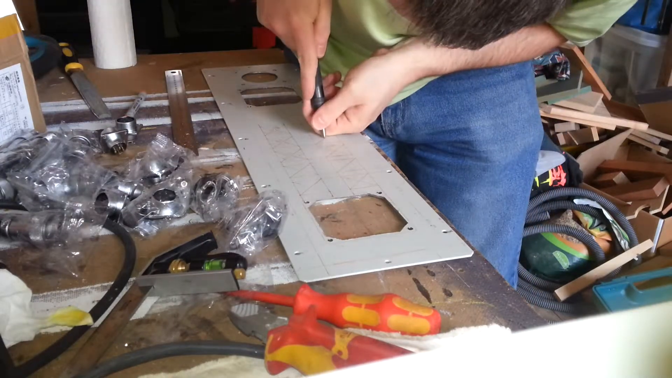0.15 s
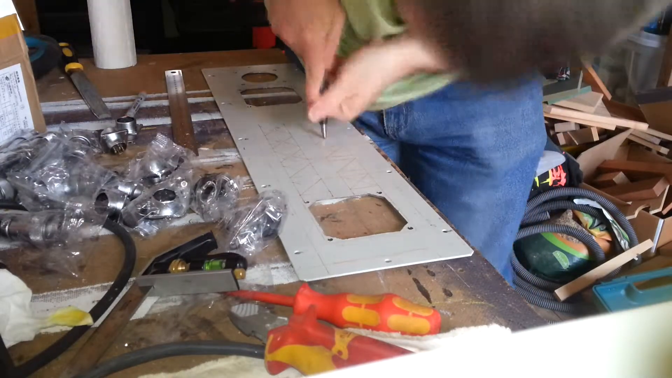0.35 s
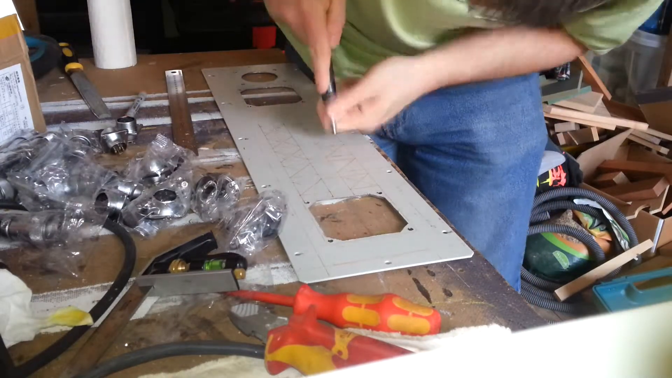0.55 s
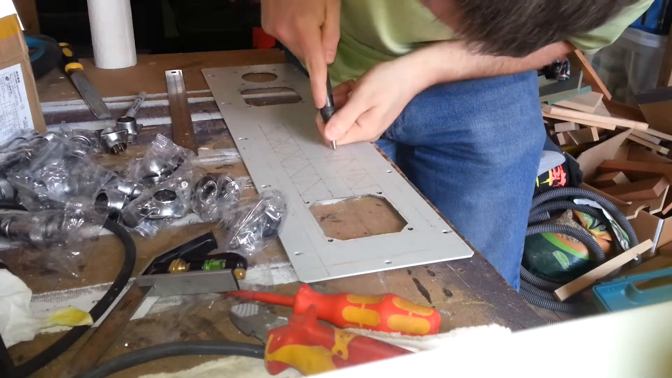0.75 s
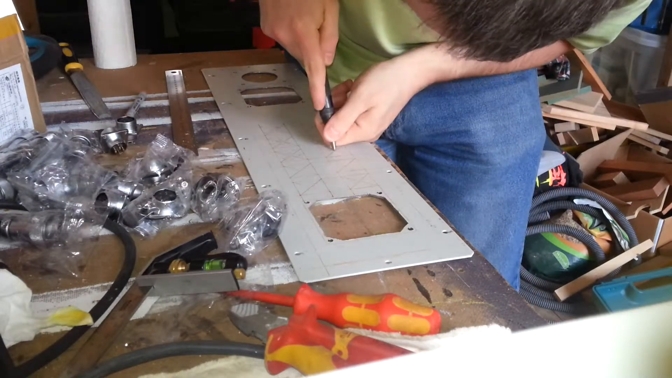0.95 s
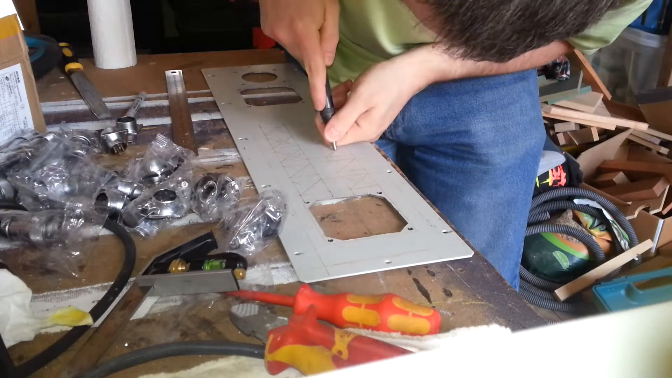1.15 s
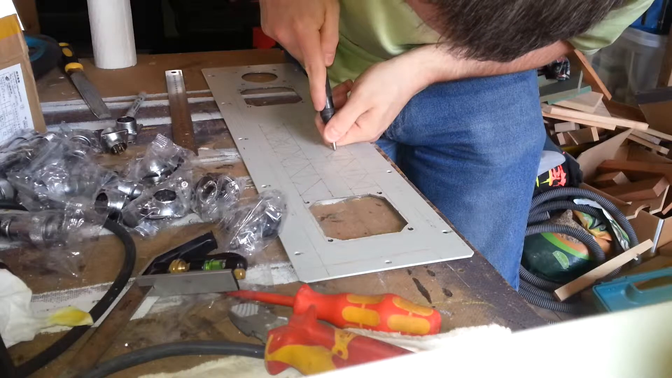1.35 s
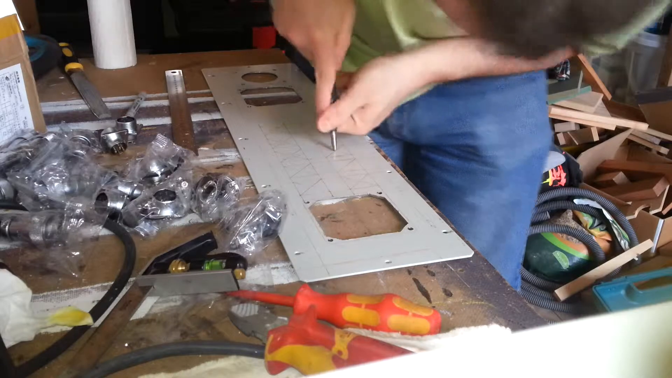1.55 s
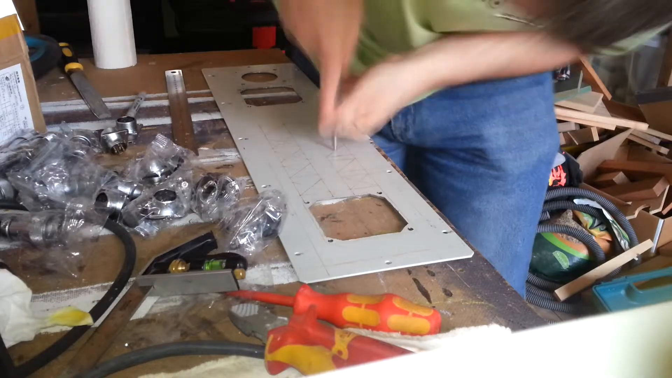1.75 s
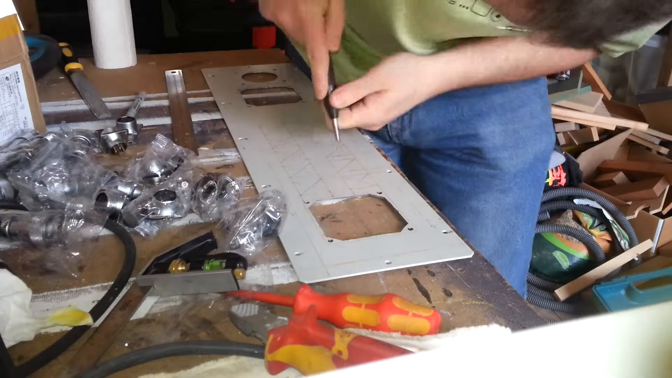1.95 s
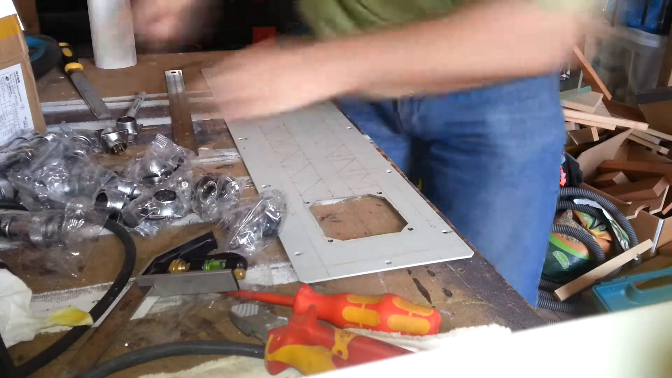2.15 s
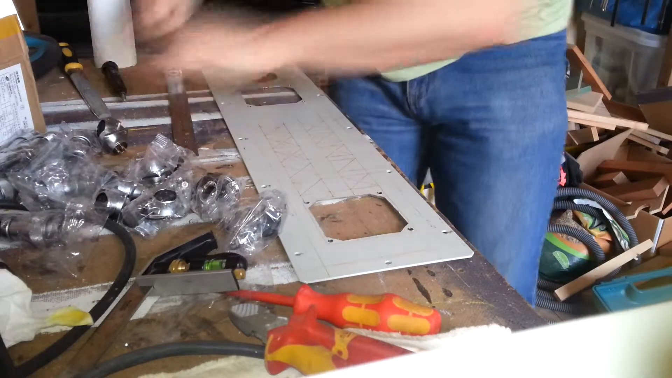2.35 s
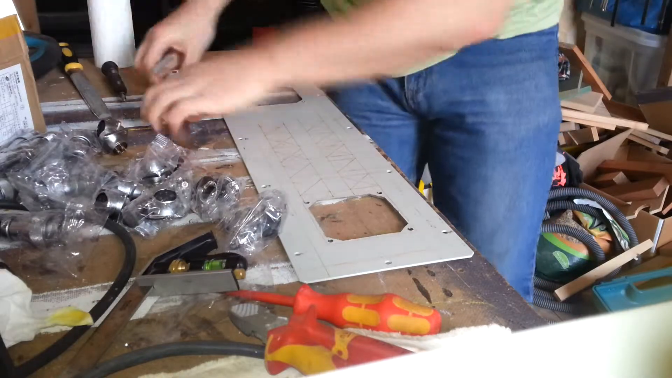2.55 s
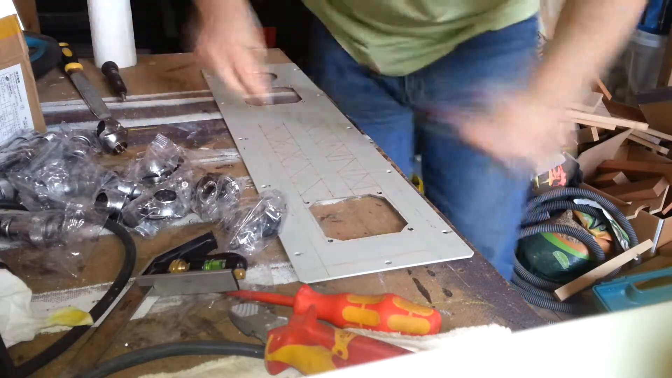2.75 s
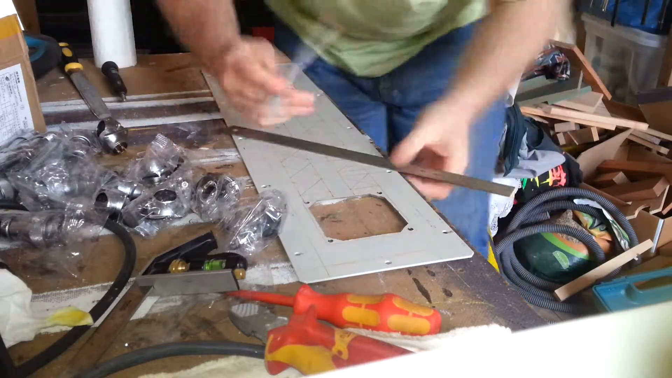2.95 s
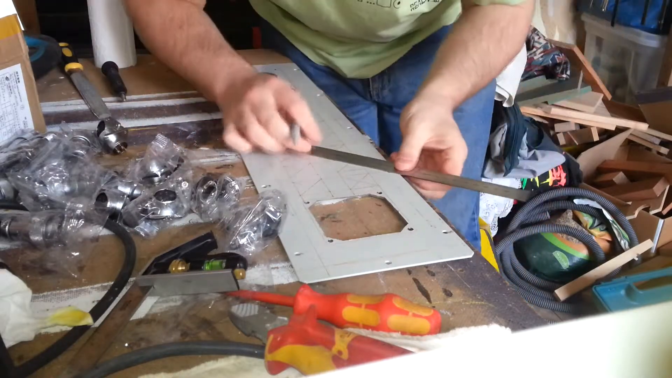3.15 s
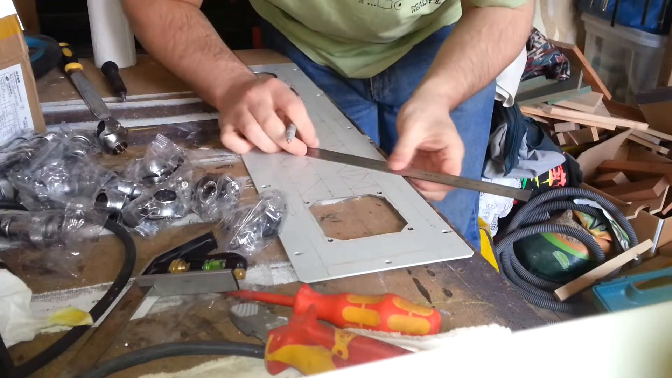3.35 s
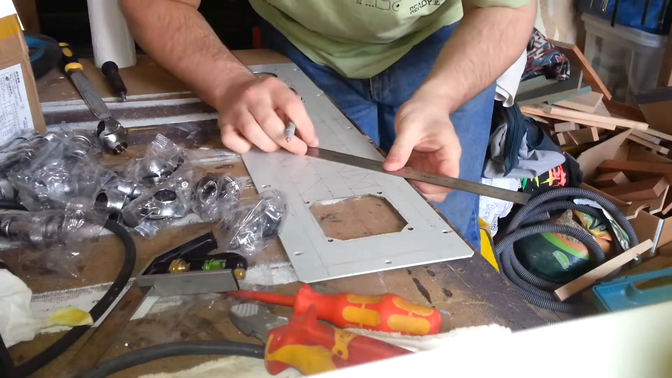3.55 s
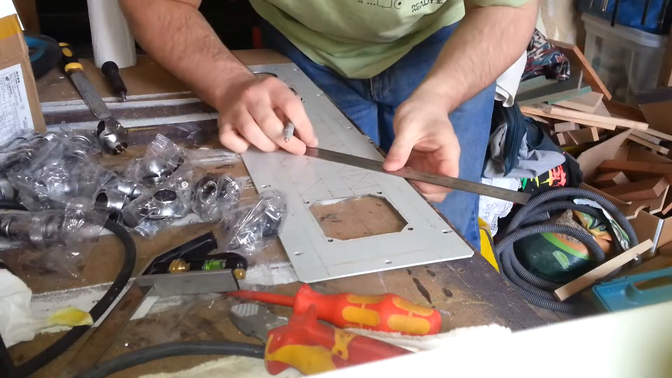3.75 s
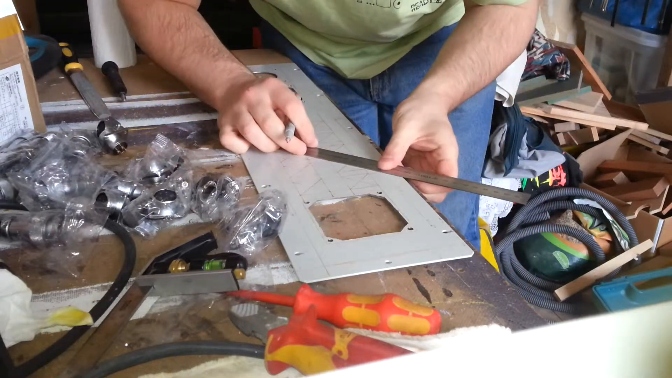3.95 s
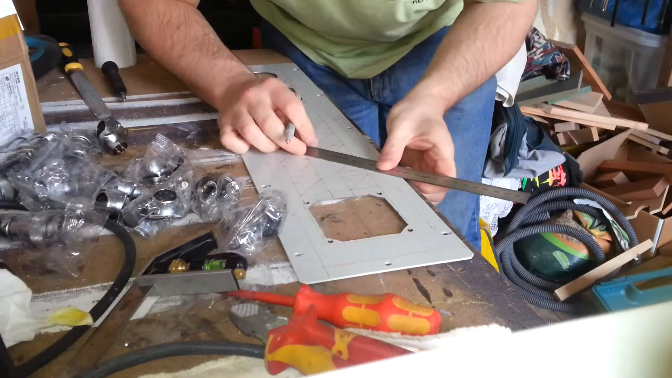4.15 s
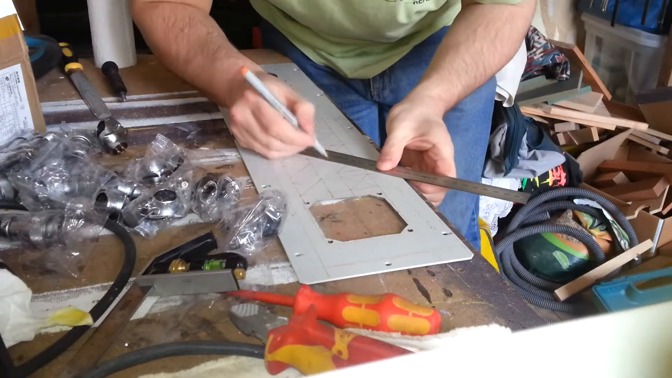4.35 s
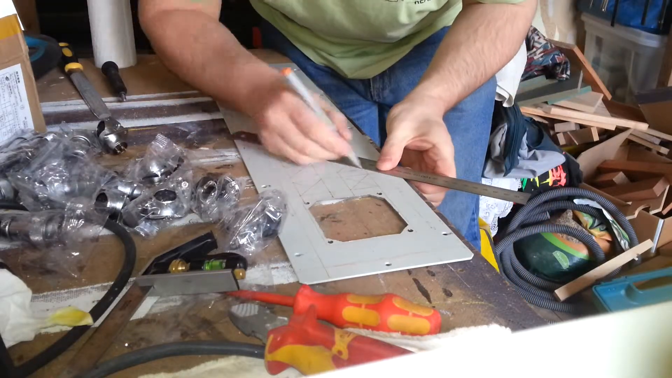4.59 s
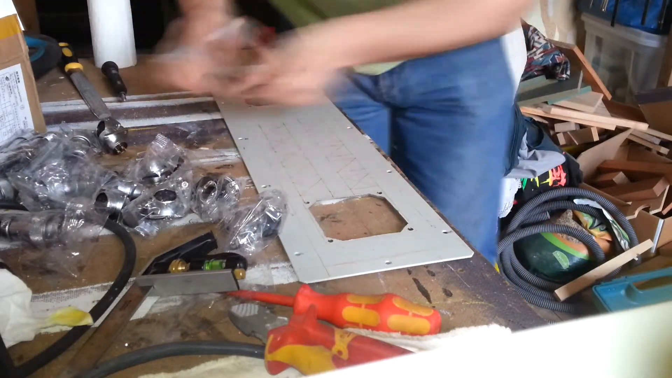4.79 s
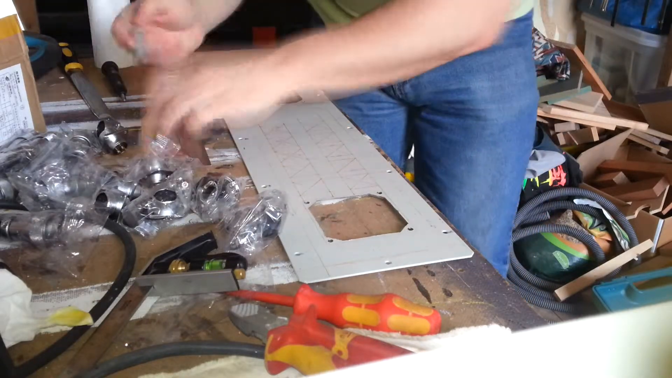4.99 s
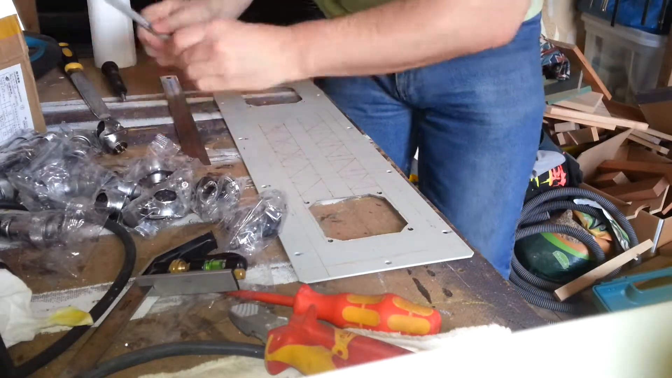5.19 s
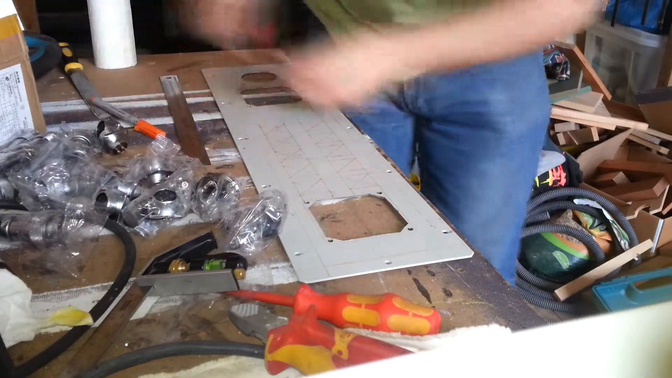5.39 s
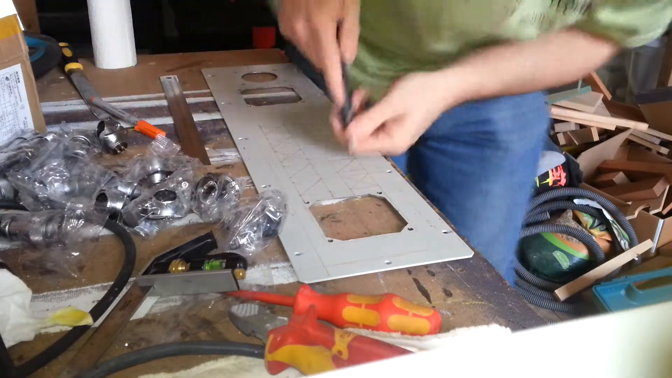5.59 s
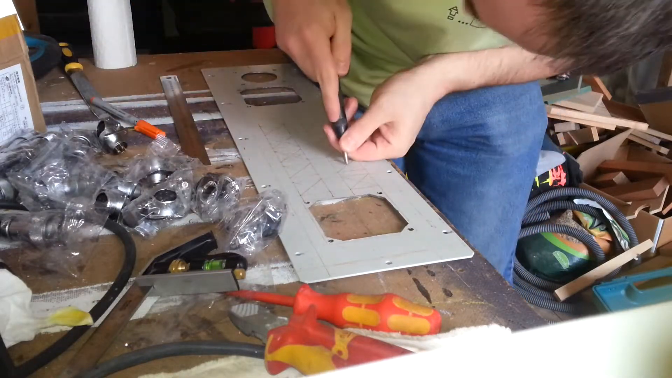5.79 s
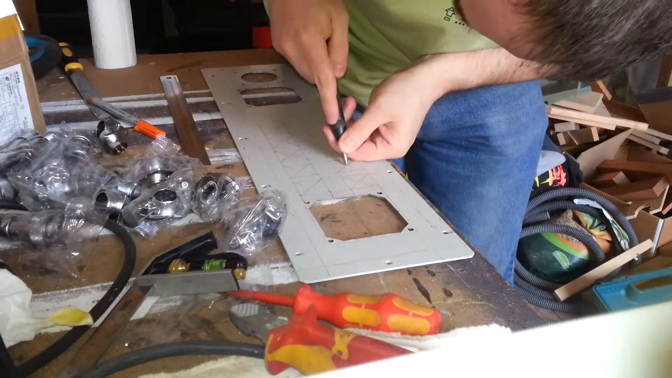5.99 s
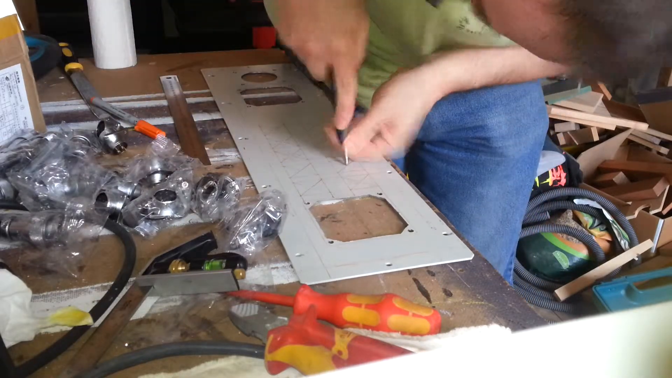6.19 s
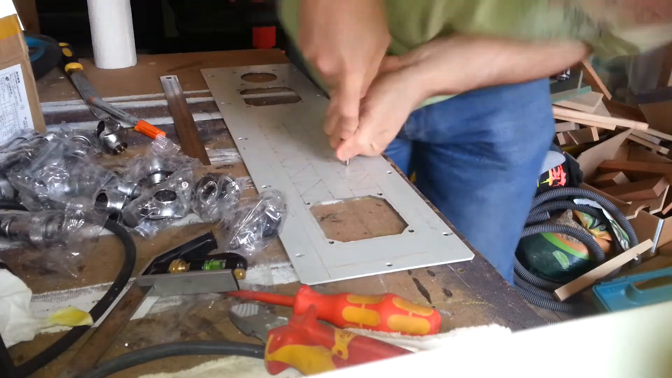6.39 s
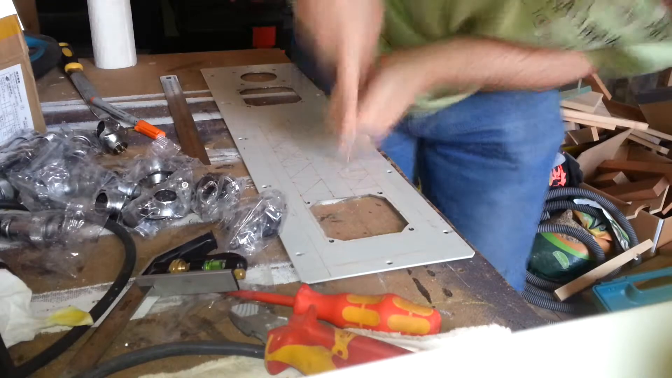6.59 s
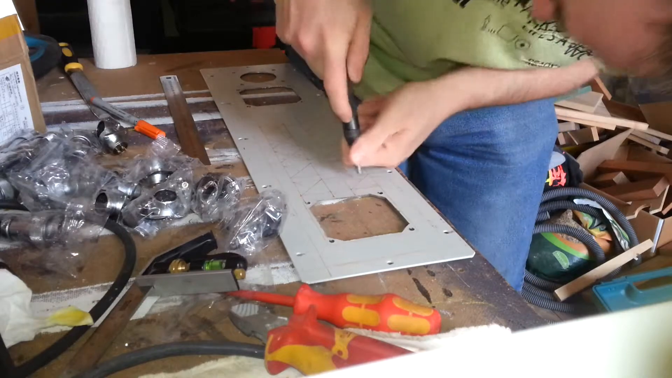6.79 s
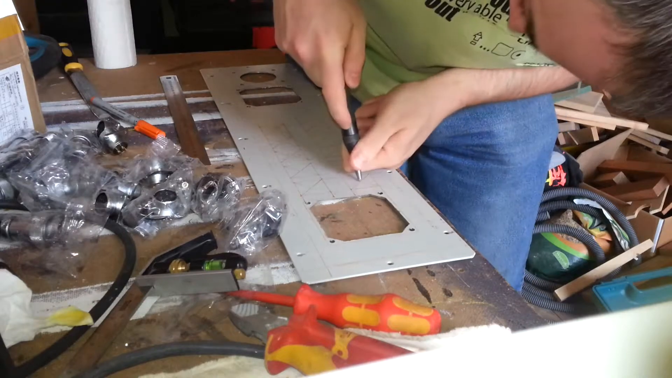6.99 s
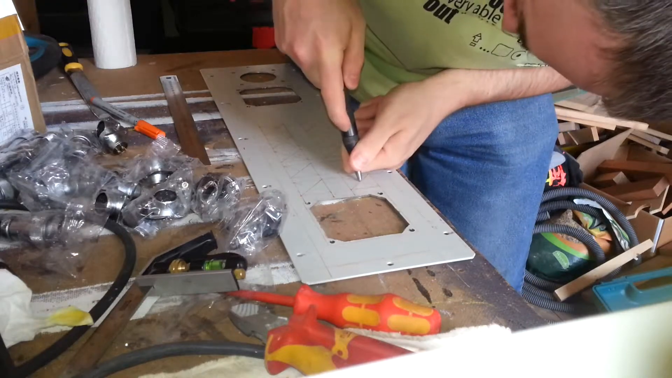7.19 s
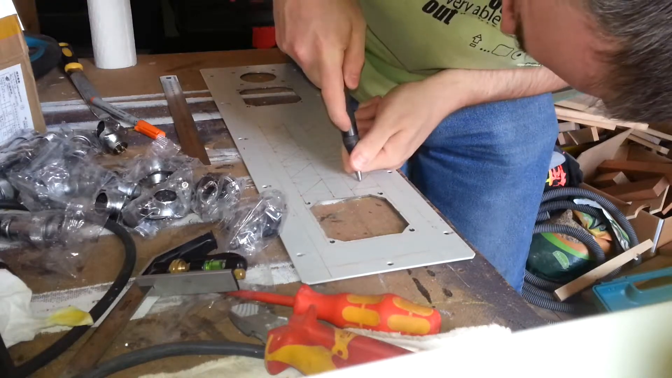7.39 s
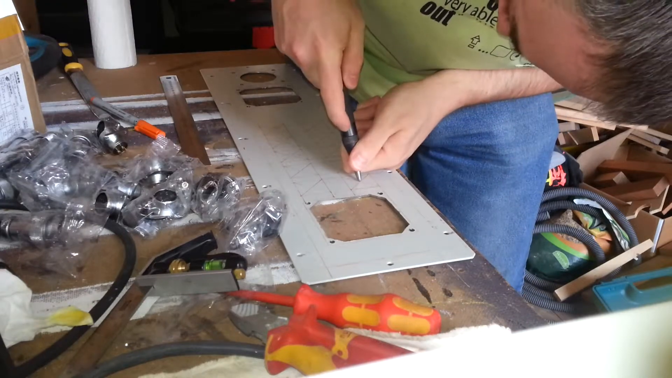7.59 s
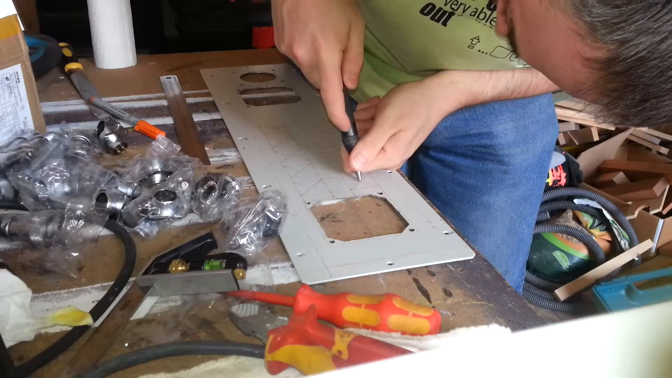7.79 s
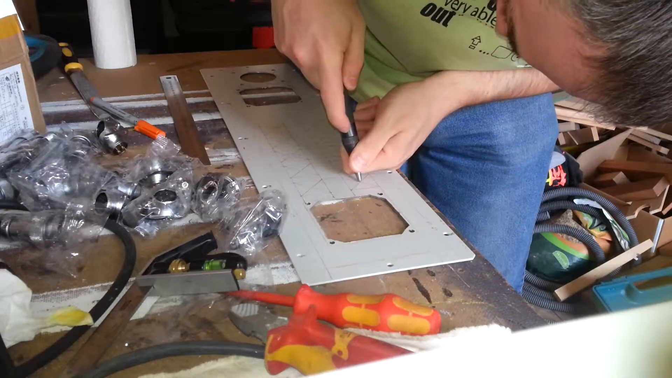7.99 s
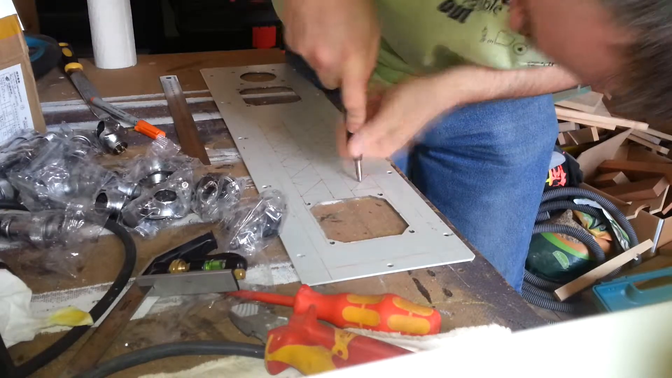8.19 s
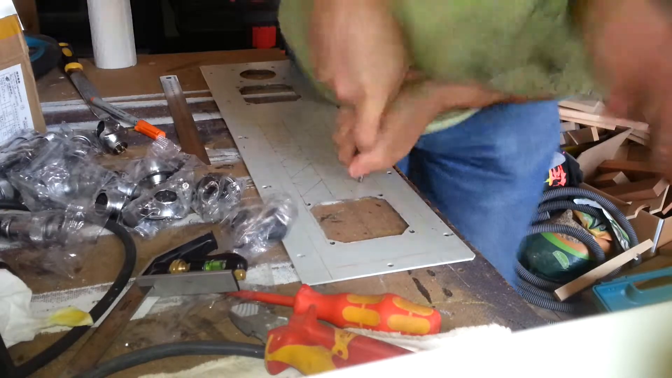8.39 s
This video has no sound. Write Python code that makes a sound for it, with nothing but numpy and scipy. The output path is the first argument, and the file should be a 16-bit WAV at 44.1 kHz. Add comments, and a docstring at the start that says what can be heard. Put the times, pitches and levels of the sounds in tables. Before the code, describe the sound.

A spring-loaded centre punch snaps on a thin metal panel, with tools knocking on a wooden bench in between.

```python
"""A spring-loaded centre punch creaks down and snaps on a thin metal panel on a cluttered wooden bench,
at 0.4 s and again at 1.7 s. From 2 s the punch, a steel rule and a pen knock as they are put down and
picked up; two more snaps land at 6.5 s and 8.3 s. Each blow is a quick swell of gritty noise through the
resonances of wood and metal, and dies fast. Underneath lie quiet workshop rumble, microphone hiss and
a far engine that revs briefly at the start, at 5.5 s and at 7.6 s."""
import sys
import numpy as np
from scipy import signal
from scipy.fft import rfft, irfft, next_fast_len
from scipy.io import wavfile
from scipy.ndimage import uniform_filter1d

SR = 44100
rng = np.random.default_rng(int(sys.argv[2]) if len(sys.argv) > 2 else 0)


def master_out(mix):
    """Clip the mix to full scale and print it as 16-bit PCM to the path in sys.argv[1]."""
    frames = np.transpose(np.atleast_2d(mix))
    ceiling = np.clip(frames, -1, 1)
    pcm = np.round(ceiling * 32767).astype(np.int16)
    wavfile.write(sys.argv[1], SR, pcm)


N = 372199

# The spring loads in creaking steps. Weight is bench over panel level, hardness is steel over panel.
# Blows: (time [s], attack [s], decay [s], panel level [dB], weight [dB], hardness [dB])
PRESSES = [(0.33, 0.012, 0.2, -60, 4.5, -17), (0.35, 0.038, 0.085, -42, 16.5, -9.5),
           (0.365, 0.017, 0.32, -27.5, -8.5, -6.5), (0.392, 0.001, 0.14, -23, -3, 2),
           (1.62, 0.048, 0.062, -40.5, 13, -12), (1.638, 0.009, 0.11, -29.5, -0.5, -5),
           (1.668, 0.001, 0.11, -23, -3, -8), (1.678, 0.009, 0.14, -20, 0.05, -7.5),
           (8.3, 0.031, 0.28, -31, 10.5, -4)]
# the spring lets go: (time [s], attack [s], panel level [dB])
SNAPS = [(0.403, 0.013, -16), (1.7, 0.017, -17), (6.508, 0.028, -17.5), (8.34, 0.028, -16)]
# the punch bounces back: (time [s], panel level [dB], shank pitch [Hz], shank level [dB])
REBOUNDS = [(0.486, -33, 3980, -60), (1.791, -33, 3980, -64), (6.613, -32.5, 9260, -62)]
# a rebound's two touches: (offset [s], attack [s], decay [s], trim [dB], weight [dB], hardness [dB])
TOUCHES = [(-0.013, 0.0048, 0.14, -1, -0.5, 1.5), (0, 0.0054, 0.11, -1.5, -3, 3)]
# clicks of spring and point: (time [s], panel level [dB], hardness [dB])
PUNCH_CLICKS = [(0.3646, -45, 2.5), (0.382, -34, 2), (0.4066, -26, 7.5), (1.6357, -37.5, -2),
                (1.653, -27, -4), (1.669, -28, -1), (1.684, -34, -2), (1.7035, -23, 7), (1.7952, -34.5, 7),
                (6.5271, -19, -1.5), (8.303, -34, -5), (8.3183, -23.5, -11.5)]
# knocks of tools, some led in by a short, faint rush of noise:
# (time [s], attack [s], decay [s], panel level [dB], weight [dB], hardness [dB])
KNOCKS = [(0.136, 0.011, 0.17, -54.5, 3, -11), (0.196, 0.032, 0.075, -49, 1.5, -15),
          (1.47, 0.01, 0.26, -55, 3, -13), (2.03, 0.003, 0.1, -54, -15, -18),
          (2.2, 0.029, 0.21, -36.5, 3.5, -0.5), (2.226, 0.01, 0.14, -24, 1, -0.5),
          (2.291, 0.018, 0.2, -39.5, -1.5, -7), (2.334, 0.0035, 0.12, -52, 15.5, -3),
          (2.387, 0.0077, 0.2, -64, 0, 1), (2.471, 0.001, 0.21, -40, -14.5, -5.5),
          (2.479, 0.006, 0.18, -28.5, -13, -5), (2.52, 0.014, 0.27, -42.5, -11, -13),
          (2.554, 0.008, 1, -46, 3, -4), (2.613, 0.031, 0.15, -26.5, -6, -16.5),
          (2.687, 0.016, 0.16, -37.5, -8, -9), (2.747, 0.015, 0.17, -43, -3, -7.5),
          (2.808, 0.0083, 0.46, -43.5, 2, -6), (2.841, 0.0026, 0.15, -37.5, -17, 9),
          (2.85, 0.012, 0.14, -30.5, -18, 4), (2.902, 0.012, 0.081, -48, -6, -5),
          (3.025, 0.017, 0.44, -57, 0, -3), (3.11, 0.0068, 0.2, -57, -3.5, -8),
          (3.151, 0.019, 0.29, -57, -6, -9), (3.229, 0.019, 0.38, -58, -2.5, -4),
          (3.553, 0.011, 0.25, -58.5, -2, -11), (4.304, 0.028, 0.22, -55.5, -2.5, -6.5),
          (4.692, 0.016, 0.31, -57, -4.5, -4.5), (4.883, 0.004, 0.54, -44, -1, -12.5),
          (4.934, 0.0055, 0.17, -21, -3, -9.5), (5.156, 0.017, 0.27, -54.5, -8, -1),
          (5.304, 0.003, 0.23, -42, 0.8, -0.5), (5.316, 0.013, 0.1, -29.5, -9, -7),
          (5.383, 0.007, 0.27, -60, 4, -4), (6.112, 0.017, 0.17, -44.5, -1.5, -1),
          (6.16, 0.0088, 0.18, -57.5, 5, -11), (6.3, 0.0069, 0.52, -50.5, 9, -3),
          (6.32, 0.019, 0.12, -24.5, 3.5, -4.5), (6.427, 0.015, 0.28, -59, 4, -4),
          (8.098, 0.037, 0.22, -65.5, 9, -7), (8.239, 0.076, 0.2, -55, 8.5, -9.5)]
# clicks of tool edges: (time [s], panel level [dB], hardness [dB])
EDGE_CLICKS = [(2.2306, -24.5, 3.5), (2.2968, -36, -5), (2.488, -32, -8), (2.65, -30, -13),
               (2.858, -32, 6.5), (4.938, -30, -20.5), (6.123, -42.5, 1.5), (6.3214, -25.5, -2.5)]
# notes that stand out of the clatter: (time [s], pitch [Hz], level [dB])
NOTES = [(0.22, 465, -50.5), (1.728, 930, -21.5), (2.029, 985, -52.5), (2.226, 3950, -29.5),
         (2.332, 431, -41.5), (2.482, 10400, -45.5), (2.635, 680, -30.5), (2.7, 900, -41.5),
         (2.757, 523, -46), (2.812, 561, -41.5), (2.845, 3714, -29.5), (2.9, 900, -46.5),
         (4.33, 870, -53.5), (4.886, 488, -45), (4.94, 480, -37.5), (4.94, 995, -27.5), (4.94, 1264, -29.5),
         (5.32, 460, -41), (6.32, 356, -28.5), (6.36, 3930, -49.5), (6.445, 3715, -61.5), (8.312, 150, -34)]
# the steel rule jingles as it shifts: (time [s], level [dB])
JINGLES = [(2.848, -30.5), (3.055, -61.5), (3.17, -65), (3.238, -62.5), (4.325, -62)]
# the rule's modes: (pitch [Hz], trim [dB])
RULE_MODES = [(3500, 0), (3950, -4)]
# the whole bench jolts under the hardest blows: (time [s], level [dB])
JOLTS = [(0.404, -49.5), (1.696, -36), (4.935, -57), (6.319, -59), (6.513, -34.5), (8.31, -46),
         (8.349, -42)]

# Bodies: (low cut [Hz], high cut [Hz]), then resonances (centre [Hz], width [Hz], level over band [dB])
BENCH = (91, 840), [(141, 35, -2), (327, 82, 4.5), (438, 60, 2), (620, 60, 8.5)]
BOARDS = (120, 920), [(139.8, 25, -1.5), (333, 71, 4), (453.8, 46, 5.5), (627, 130, 2.5)]  # light tools shake only the boards near them
PANEL = (600, 2800), [(770.5, 51, 1), (917, 180, 1), (1165, 73, 2), (1700, 210, -7), (1830, 80, -8)]
PUNCH_STEEL = (2000, 4880), [(3256, 40, -3), (3490, 77, 4), (3862, 470, 3), (4320, 120, 2),
               (4400, 120, -1.5), (4500, 1300, 2)]
TOOL_BODIES = (2350, 5500), [(2467, 360, 2), (3273, 270, -4), (3582, 530, 0.5)]  # pen, rule and loose tools ring blunter than the punch
RATTLE = (4400, 10000), [(5600, 690, -2), (7166, 1400, 1), (8700, 550, -3)]
SIZZLE = (12000, 11000), [(10400, 1100, 2.5), (12000, 800, -2.5), (13700, 900, -4.5)]
THUMP = (15, 210), [(45.13, 40, -2.5)]
# the clatter's layers, a row each for wood, panel, steel, rattle and sizzle:
# (attack curve [exponent], decay [factor], grit [dB], stereo likeness [0-1], left over right [dB])
LAYERS = [(1.2, 0.81, 2, 0.8, -0.84), (1.3, 0.87, -1, 0, 0.83), (1.6, 0.84, 1, .3, -0.37),
          (1.9, 0.69, 1.5, .1, 3), (2.2, 0.59, 1, 0.03, 4)]
# hard blows are brighter, heavy ones duller; a row each for rattle and sizzle:
# (level over panel [dB], slope with hardness [dB/dB], slope with weight [dB/dB])
PUNCH_TREBLE = [(-8, 1.1, -0.063), (-14, 1.6, -0.15)]
TOOL_TREBLE = [(-8.5, 1.6, -0.064), (-21, 1.05, -0.85)]

# revs: (start [s], end [s], firing rate from [Hz], to [Hz], level from [dB], to [dB], octave trim [dB])
REVS = [(0.0, 0.17, 112, 125, -56, -74, -16), (5.545, 6.2, 34.07, 70, -87.5, -73.5, 10),
        (7.648, 8.199, 63, 92, -75, -76, -5.5)]
# fader ride on the murmur of air and distant machines: (time [s], level [dB])
RUMBLE_RIDE = [(0.0, -56.5), (0.82, -64.5), (2.33, -58), (3.0, -57.5), (5.99, -58), (6.6, -55.5),
               (7.59, -63), (8.18, -59.5), (8.44, -58)]
# tone of the rumble and of the microphone hiss: (frequency [Hz], level [dB])
RUMBLE_EQ = [(8.8, -67), (15, -31), (69, -8), (163, -2), (445, -7.5), (562, -11.5), (761, -11),
             (836, -14.5), (1030, -13), (4000, -32), (5200, -61.5), (8800, -120)]
HISS_EQ = [(880, -29.5), (1500, -3.5), (1960, -9.5), (2400, -4.5), (3290, -6), (3950, -4.5),
           (6130, -10), (8910, -7), (13800, -6.5), (14800, -14)]


def punch():
    """The punch's blows: the spring creaks, clicks and lets go, and the point bounces on the panel."""
    snap_decay_s, snap_weight_db, snap_hard_db = 0.18, -7.5, 5
    snaps = [(s, attack, snap_decay_s, db, snap_weight_db, snap_hard_db) for s, attack, db in SNAPS]
    bounces = [(s + offset, attack, decay, db + trim_db, weight_db, hard_db)
               for s, db, *_ in REBOUNDS
               for offset, attack, decay, trim_db, weight_db, hard_db in TOUCHES]
    blows = PRESSES + snaps + bounces + clicks(PUNCH_CLICKS)
    return clatter(blows, BENCH, PUNCH_STEEL, PUNCH_TREBLE)


def tools():
    """Punch, rule and pen knock on the boards; a short, faint rush of noise leads into some knocks."""
    return clatter(KNOCKS + clicks(EDGE_CLICKS), BOARDS, TOOL_BODIES, TOOL_TREBLE)


def clicks(rows, attack_s=0.0011, decay_s=0.05, weight_db=-7.5):
    """Sharp contacts as short, light blows."""
    return [(s, attack_s, decay_s, db, weight_db, hard_db) for s, db, hard_db in rows]


def clatter(blows, wood, steel, treble):
    """Tiny contacts blur into gritty noise in five layers; the treble comes in later and dies sooner."""
    start, attack, decay, panel_db, weight_db, hard_db = np.transpose(blows)
    levels = [panel_db + weight_db, panel_db, panel_db + hard_db]
    levels += [panel_db + trim_db + hard_slope * hard_db + weight_slope * weight_db
               for trim_db, hard_slope, weight_slope in treble]
    out = 0
    for body, db, layer in zip((wood, PANEL, steel, RATTLE, SIZZLE), levels, LAYERS):
        curve, decay_scale, grit_db, likeness, pan_db = layer
        shake = shaking(zip(start, attack, decay, db), curve, decay_scale)
        grit = stereo_noise(likeness) * undb(grit_db * flicker(700))
        out += resonate(grit * shake, body) * undb([[pan_db / 2], [-pan_db / 2]])
    return out


def shaking(blows, curve, decay_scale):
    """How hard one body is shaken by (start, attack, decay, level) blows; their energies add."""
    energy = np.zeros(N + SR)
    for start, attack, decay, db in blows:
        i = int(start * SR)
        energy[i:i + SR // 3] += (undb(db) * envelope(attack, decay * decay_scale, curve)) ** 2
    return np.sqrt(energy[:N])


def envelope(attack, decay, curve, steepening=0.53):
    """A third of a second that swells, then fades ever faster to an abrupt end."""
    t = np.arange(SR // 3) / SR
    gone = (t - attack) / decay
    tail_db = -60 * gone * (1 - steepening / 4 + steepening * gone)
    return np.where(t < attack, (t / attack) ** curve, undb(tail_db))


def resonate(x, body):
    """A body radiates in a steep-sided band with resonances on top; white noise keeps its level."""
    (low_hz, high_hz), modes = body
    size = next_fast_len(N + SR // 4)
    f = np.arange(1, size // 2 + 2) * SR / size
    up, down = 1j * f / high_hz, low_hz / (1j * f)
    band = 1 / ((1 + np.sqrt(2) * up + up ** 2) * (1 + np.sqrt(2) * down + down ** 2)) ** 3
    peaks = sum(undb(db) / (1 + 1j * (f / hz - hz / f) * hz / width) for hz, width, db in modes)
    gain = band * (1 + peaks)
    gain /= np.sqrt(np.mean(np.abs(gain) ** 2))
    return irfft(rfft(x, size) * gain, size)[:, :N]


def bench_jolts(attack_s=0.015, decay_s=0.083):
    """Low-end thumps as the whole bench takes a blow."""
    shake = shaking([(s, attack_s, decay_s, db) for s, db in JOLTS], curve=0.61, decay_scale=0.87)
    return resonate(stereo_noise(0.8) * shake, THUMP)


def ringing(attack_s=0.009, decay_at_1khz_s=0.1, shank_decay_s=0.29, rough_db=2):
    """Struck parts, the rule and the punch's shank ring on as slightly rough, fading sines."""
    out, t = np.zeros((2, N + SR)), np.arange(SR // 3) / SR
    jingles = [(s, hz, db + trim_db) for s, db in JINGLES for hz, trim_db in RULE_MODES]
    notes = [(s, hz, db, decay_at_1khz_s * (1000 / hz) ** 0.15) for s, hz, db in NOTES + jingles]
    notes += [(s, hz, db, shank_decay_s) for s, _, hz, db in REBOUNDS]
    for start, hz, db, decay in notes:
        phase, skew = rng.uniform(-np.pi, np.pi, 2)
        spread = skew * min(hz / 4000, 0.25) * np.array([[1], [-1]])  # low notes sit narrower
        tone = np.sqrt(2) * np.sin(2 * np.pi * hz * t + phase + spread)
        i = int(start * SR)
        out[:, i:i + len(t)] += undb(db) * envelope(attack_s, decay, curve=0.61) * tone
    return out[:, :N] * undb(rough_db * flicker(250))


def workshop_rumble(flicker_db=1.2):
    """Air and distant machines make a low bed that drifts and flickers."""
    level_db = np.interp(np.arange(N) / SR, *np.transpose(RUMBLE_RIDE)) + flicker_db * flicker(9.9)
    left, right = colour(stereo_noise(0.066), RUMBLE_EQ)
    mid, side = (left + right) / 2, (left - right) / 2
    # long waves reach both microphones alike, so the sides lose bass
    side -= 0.5 * signal.lfilter(*signal.butter(1, 700, fs=SR), side)
    return undb(level_db) * (mid + side * np.array([[1], [-1]]))


def microphone_hiss(level_db=-68):
    """The steady, wide noise floor of two microphones."""
    return undb(level_db) * colour(stereo_noise(0.067), HISS_EQ)


def far_engine(fade_s=0.017, flicker_db=4):
    """A wavering hum at the firing rate and its octave, rising through each rev."""
    out, t = np.zeros(N), np.arange(N) / SR
    for start, end, from_hz, to_hz, from_db, to_db, octave_db in REVS:
        fade = np.clip(np.minimum(t - start, end - t) / fade_s, 0, 1)
        phase = 2 * np.pi * np.cumsum(np.interp(t, [start, end], [from_hz, to_hz])) / SR
        db = np.interp(t, [start, end], [from_db, to_db]) + flicker_db * flicker(12)
        out += fade * undb(db) * (np.sin(phase) + undb(octave_db) * np.sin(2 * phase))
    return np.sqrt(2) * out


def colour(x, eq):
    """Shape noise with an EQ curve, to rms 1."""
    hz, db = np.transpose(eq)
    size = next_fast_len(N)
    f = np.arange(1, size // 2 + 2) * SR / size
    gain = undb(np.interp(np.log(f), np.log(hz), db, right=-90))
    shaped = irfft(rfft(x, size) * gain, size)[:, :N]
    return shaped / np.sqrt(np.mean(shaped ** 2))


def stereo_noise(likeness):
    """White noise, from fully wide at 0 to mono at 1."""
    mid, side = rng.standard_normal((2, N))
    return (np.sqrt(1 + likeness) * mid + np.sqrt(1 - likeness) * side * np.array([[1], [-1]])) / 2 ** 0.5


def flicker(rate_hz):
    """Slewed random sample-and-hold with a spread near 1."""
    hold = int(SR / rate_hz)
    steps = np.repeat(rng.standard_normal(N // hold + 1), hold)
    return uniform_filter1d(steps, hold)[:N] * np.sqrt(3 / 2)


def undb(db):
    """Decibels to gain."""
    return 10 ** (np.asarray(db) / 20)


def scene():
    """Punch and tools up front, the workshop behind."""
    foreground = punch() + tools() + bench_jolts() + ringing()
    return foreground + workshop_rumble() + microphone_hiss() + far_engine()


def record(dry):
    """Peaks are rounded, the microphone rolls off the very top and the recorder cuts the rest."""
    rounded = 1.2 * np.tanh(dry / 1.2)
    rolled_off = signal.sosfilt(signal.butter(4, 15200, fs=SR, output="sos"), rounded)
    return signal.sosfilt(signal.ellip(10, 0.2, 80, 15900, fs=SR, output="sos"), rolled_off)


dry = scene()
out = record(dry)
master_out(out)
```